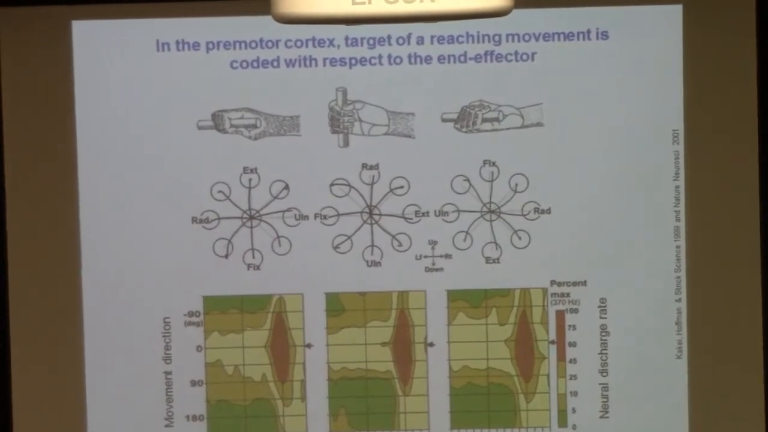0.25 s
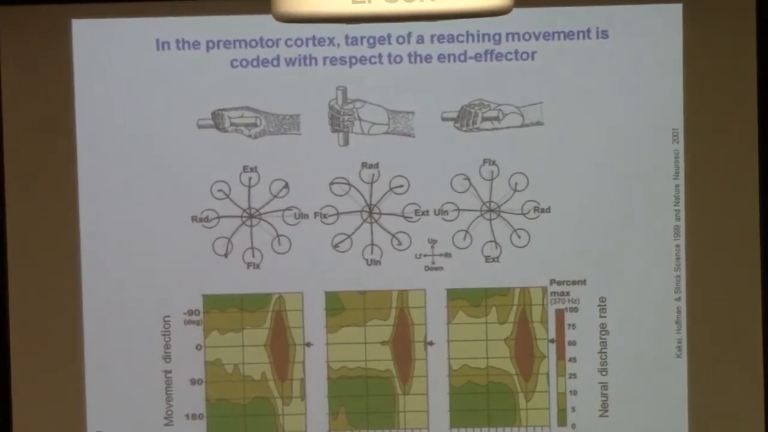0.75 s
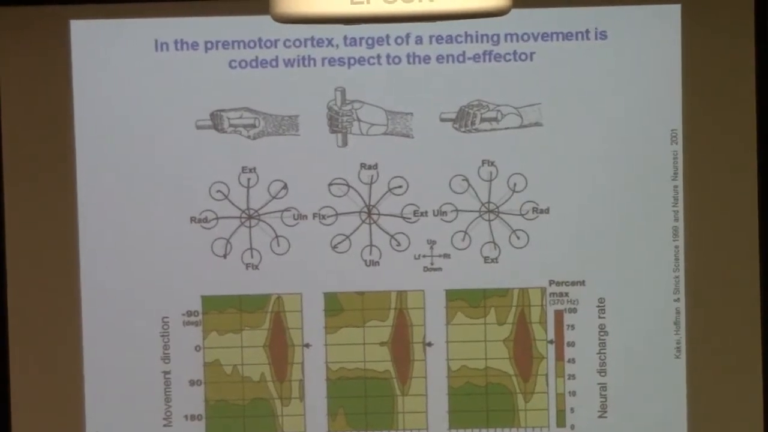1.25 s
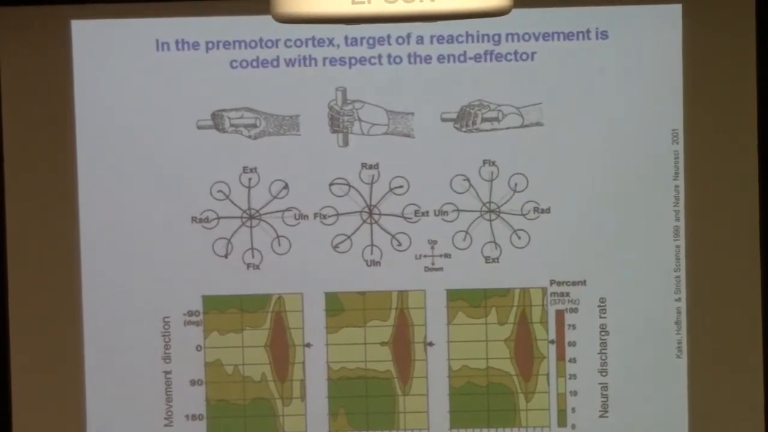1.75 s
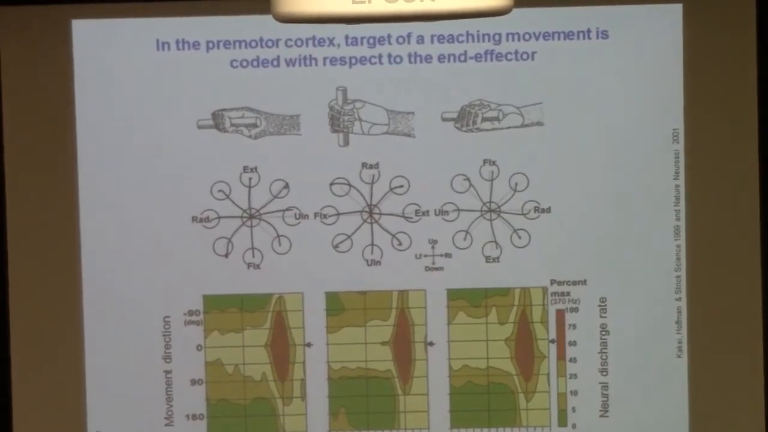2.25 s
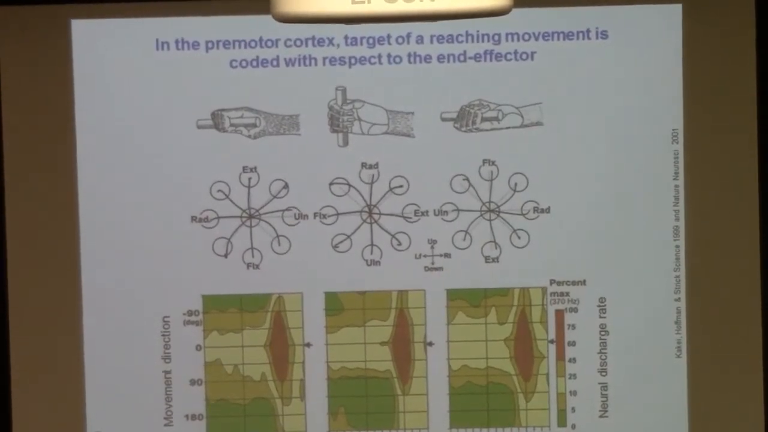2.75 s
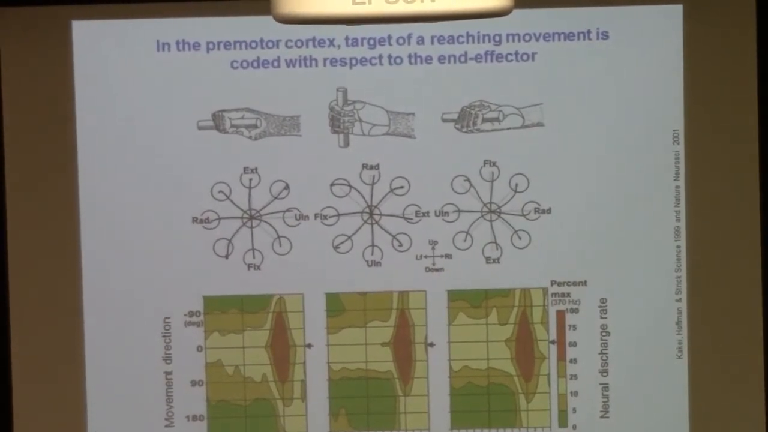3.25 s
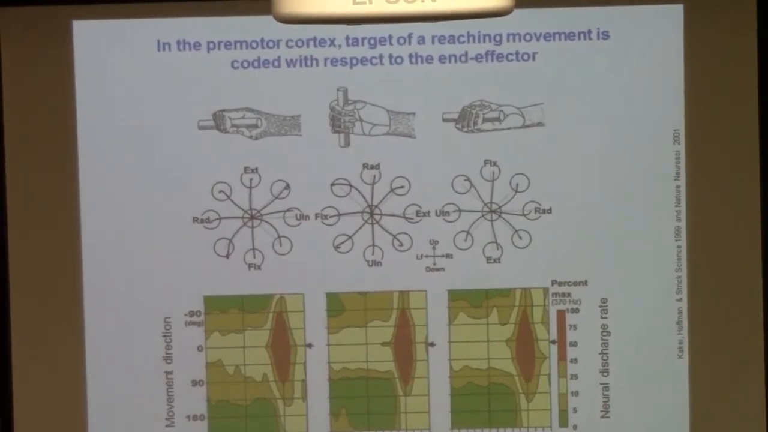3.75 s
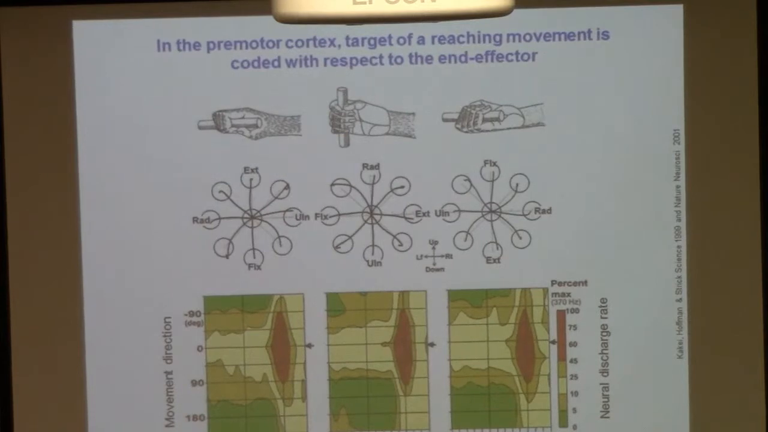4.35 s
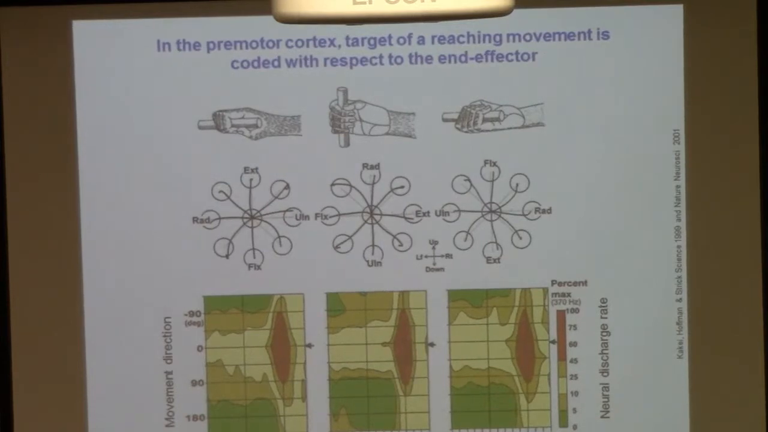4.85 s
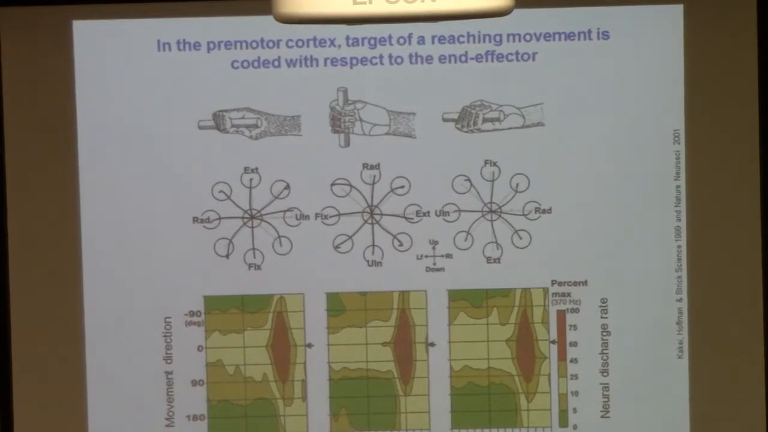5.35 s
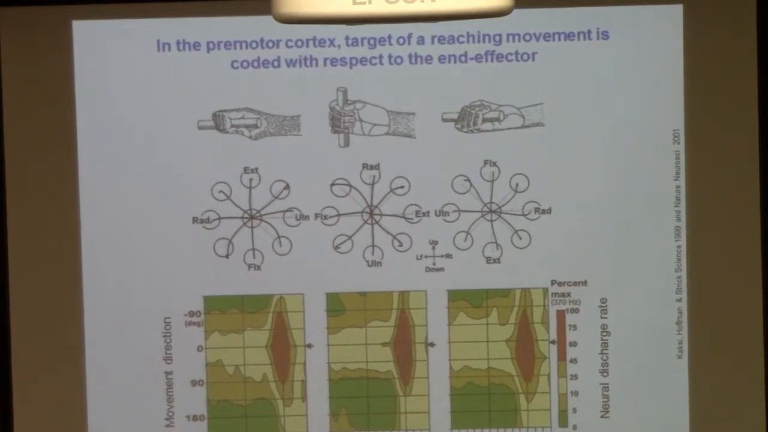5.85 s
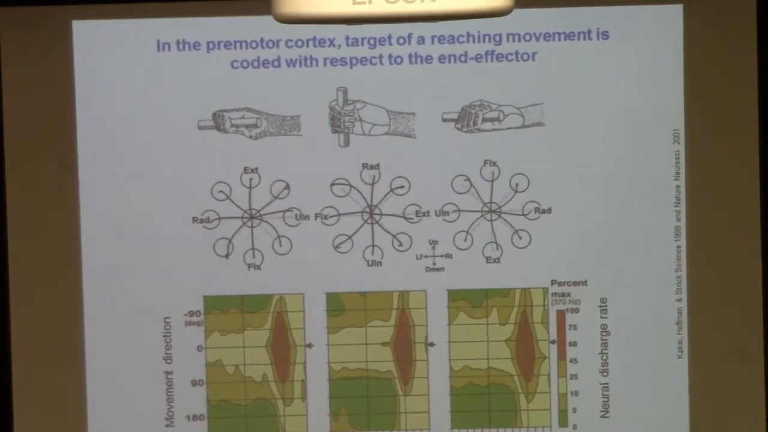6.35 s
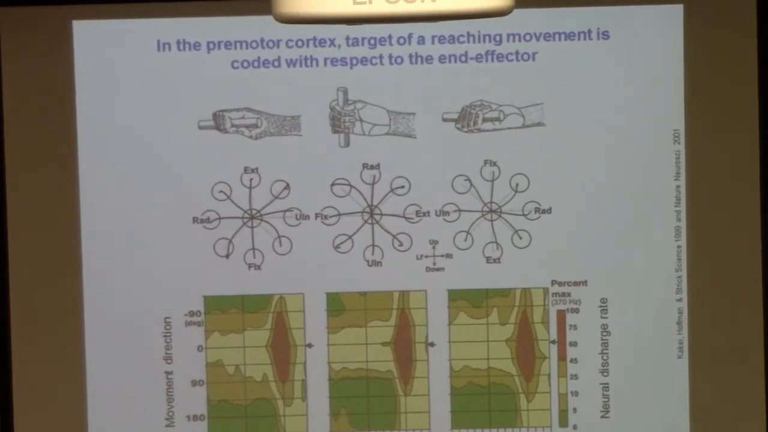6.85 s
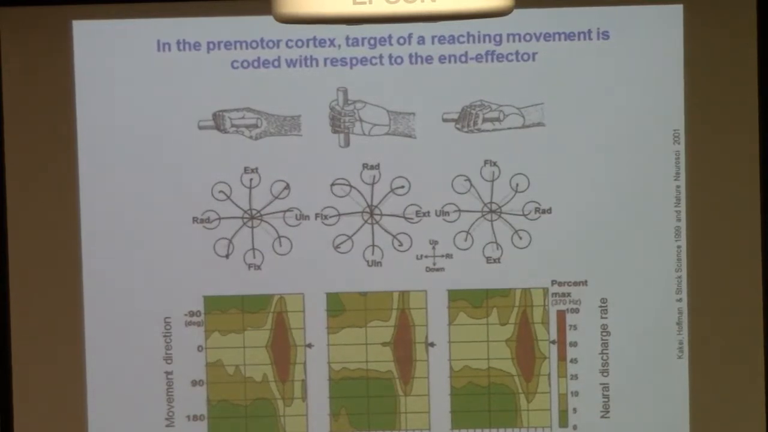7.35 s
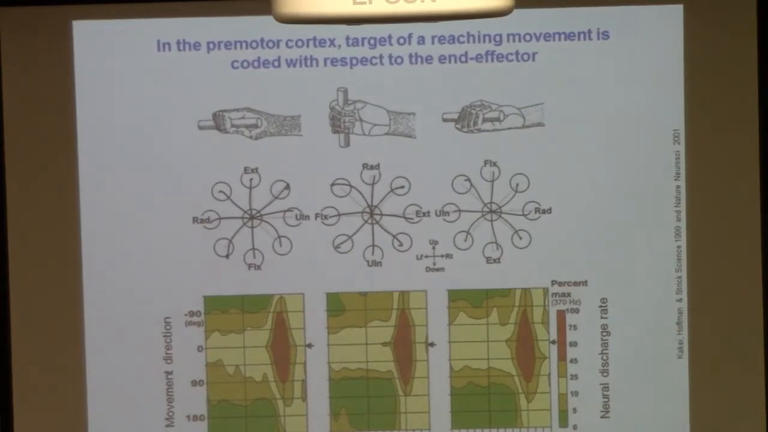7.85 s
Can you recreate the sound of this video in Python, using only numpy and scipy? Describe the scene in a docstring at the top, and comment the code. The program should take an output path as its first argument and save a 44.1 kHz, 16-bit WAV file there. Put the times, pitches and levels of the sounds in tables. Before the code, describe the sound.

Low electrical buzz over soft amplifier hiss, scratched by two brief contact crackles in the first second, then slowly rising and falling in strength.

```python
"""Buzzing mains hum, scratched early on by a loose contact, over amplifier hiss at a stereo input in a quiet room.
Hum: a rectifier switches on and off every half cycle and its edges ring; harmonics are summed into one cycle.
The pickup swells and sinks as a hand or cable moves; a steady ground-loop sine adds to it.
Scratches: grainy noise bursts that also lower the hum. Hiss: filtered noise with a partly shared rumble."""
import sys
import numpy as np
from scipy import signal
from scipy.fft import rfft, irfft
from scipy.io import wavfile
from scipy.ndimage import uniform_filter1d

SR = 44100
rng = np.random.default_rng(int(sys.argv[2]) if len(sys.argv) > 2 else 0)


def field_ratio(decibels):
    """Amplitude ratio for a level in dB (20 dB per decade); scalars and array-likes work."""
    return 10 ** (np.asarray(decibels, dtype=float) / 20)


def generate_wav(signal):
    """Clip the signal to [-1, 1] and save it as 16-bit WAV at the path in sys.argv[1]."""
    frames = np.transpose(np.atleast_2d(signal))
    scaled = np.clip(frames, -1, 1) * 32767
    pcm = np.round(scaled).astype(np.int16)
    wavfile.write(sys.argv[1], SR, pcm)


N = 357210

NOMINAL_HZ = 60
FIRST_TURN_ON_S = 0.00595
WIRING_KHZ, RING_DECAY_MS = 1.834, 0.23  # coupling path: corner of two low-passes, ring time constant
SINE_CREST = 0.24  # mains voltage picked up, in the units of the switching steps
LOOP_CREST_MS = 1.2  # after turn-on
HISS_DB = -61.5

# Mains frequency: time_s, mains_hz
MAINS_TRACK = [(0, 59.9984), (4, 59.9963), (8.1, 59.9953)]
# Rectifier switchings in a half cycle: after_turn_on_ms, step (relative), sag_ms, kick (relative), ring_khz
RECTIFIER_EDGES = [(0, -0.71, 6.9, -3.5, 2.416), (1.32, -0.18, 0.35, 0.5, 2.93),
                   (2.55, 0.35, 29, 1.5, 3.13), (5.45, 0.15, 0.12, 0.21, 2.06)]
# Turn-on spike, unequal as the diodes differ: width_ms, first_half_area, second_half_area (relative)
DIODE_SPIKE = (0.012, -0.0048, -.016)
# Pickup as hand or cable moves: time_s, level_db
PICKUP_TRACK = [(0.0, -49.7), (0.34, -50.5), (0.45, -52), (0.65, -50), (3.25, -50.5), (3.52, -48.5),
                (3.7, -51.5), (3.9, -55), (5.28, -54.5), (5.5, -50), (5.89, -45.5), (6.72, -44.5),
                (6.84, -47), (6.95, -53), (7.11, -54.5), (7.9, -55), (8.1, -49.5)]
# Stereo lean of the pickup: pickup_db, left_minus_right_db
PICKUP_LEAN = [(-53.5, 1.1), (-50, 2.5), (-49, 1.5), (-45.5, -1), (-44.5, -1)]
# Ground-loop sine rms: left_db, right_db
LOOP_LEVELS_DB = [-67.5, -68]
# Cracks of the slipping contact: time_s, level_db, tilt_db_per_octave
CONTACT_CRACKS = [(.077, -48, 0.2), (.881, -48, -1.36)]
# Sizzle, snap and settling of each slip:
# from_crack_ms, length_ms, beside_crack_db, added_tilt_db_per_octave, hum_lost (share)
SLIP_STAGES = [(-25, 29.7, -1, -.5, 0.31), (-6, 13.3, -1, 1.54, 0), (1, 17, 1, -3.5, 0.28)]
# Soft rustles of the contact: start_s, length_s, level_db, tilt_db_per_octave
CONTACT_RUSTLES = [(.654, .042, -59, -1.5), (.698, 0.047, -55, -2), (.75, 0.089, -57.5, -4.5),
                   (.80, .05, -59, -3), (.835, 0.038, -55.5, -2)]
RUSTLE_HUM_LOST = 0.039  # share
# Scratch spectrum before tilt: frequency_hz, density_db (per Hz, relative)
SCRATCH_SPECTRUM = [(60, -7), (120, -1), (300, -5.5), (700, -8), (1300, -11), (1800, -14), (2800, -15.5),
                    (4500, -22), (15000, -37)]
# Hiss spectrum: frequency_hz, density_db (per Hz, relative)
HISS_SPECTRUM = [(8, -4.5), (25, 0), (100, -9), (330, -11.5), (750, -15), (1700, -16), (3800, -17.5),
                 (7000, -19.5), (11000, -21), (16000, -23)]
# Hiss common to left and right: frequency_hz, shared_power (share)
HISS_SHARED = [(20, 0.9), (100, 0.22), (330, 0.23), (1000, .0), (2000, 0.031), (5000, 0)]


def unit_rms(x):
    """Scales to rms 1."""
    return x / np.sqrt(np.mean(x ** 2) + 1e-20)


def read_spectrum(points, hz):
    """Interpolates a spectrum on a log-frequency axis."""
    point_hz, value = np.transpose(points)
    return np.interp(np.log(hz + 1), np.log(point_hz + 1), value)


def coloured(x, db_of_hz):
    """Filters along time by a gain in dB given as a function of frequency."""
    size = x.shape[-1]
    gain = field_ratio(db_of_hz(np.fft.rfftfreq(size, 1 / SR)))
    return irfft(rfft(x) * gain, size)


def drift(top_hz):
    """Slow random motion of rms 1: noise low-passed at top_hz."""
    return unit_rms(coloured(rng.standard_normal(N), lambda hz: -20 * np.log10(1 + (hz / top_hz) ** 2)))


def rectifier_cycle(size=8192):
    """One cycle from turn-on as (steps, rings): odd harmonics of sagging steps and damped rings, plus spikes."""
    k = np.arange(1, 270)  # harmonic
    s = 2j * np.pi * k * NOMINAL_HZ / 1000  # per ms
    damped = s + 1 / RING_DECAY_MS
    wiring = 1 / (1 + s / (2 * np.pi * WIRING_KHZ)) ** 2
    steps, rings = np.zeros((2, size // 2 + 1), complex)
    for after_ms, step, sag_ms, kick, ring_khz in RECTIFIER_EDGES:
        # odd harmonics only: the second half cycle is the first one inverted
        edge = k % 2 * np.exp(-s * after_ms) * 2 * NOMINAL_HZ / 1000 * wiring
        steps[k] += edge * step / (s + 1 / sag_ms)
        rings[k] += edge * kick * damped / (damped ** 2 + (2 * np.pi * ring_khz) ** 2)
    steps[1] -= SINE_CREST / 2

    width_ms, first_area, second_area = DIODE_SPIKE
    areas = first_area + second_area * (-1) ** k
    gaussian = np.exp(-4 * s * width_ms + (s * width_ms) ** 2 / 2)
    rings[k] += areas * gaussian * NOMINAL_HZ / 1000
    fundamental = abs(steps[1] + rings[1])
    return irfft([steps, rings]) / fundamental * size / np.sqrt(2)  # fundamental at rms 1


def turn_on_fizz(turns, fizz_db=-28, decay_ms=0.37, steady=0.14):
    """High-passed noise jumps at each turn-on and decays to a little steady interference."""
    since_ms = turns * 1000 / NOMINAL_HZ % (1000 / (2 * NOMINAL_HZ))
    noise = coloured(rng.standard_normal(N), lambda hz: -10 * np.log10(1 + (1500 / (hz + 1)) ** 2))
    return field_ratio(fizz_db) * noise * (steady + np.exp(-since_ms / decay_ms))


def hum(contact, jitter_us=6.7, waver_db=0.37, flutter_db=0.64, ring_pan=0.91):
    """Plays the cycle at mains speed through a moving coupling; a steady ground-loop sine at mains speed adds."""
    t = np.arange(N) / SR
    mains_hz = np.interp(t, *np.transpose(MAINS_TRACK))
    turns = np.cumsum(mains_hz) / SR - MAINS_TRACK[0][1] * FIRST_TURN_ON_S
    jitter_turns = jitter_us * 1e-6 * NOMINAL_HZ * drift(top_hz=40)  # switching instants tremble
    phase = (turns + jitter_turns) % 1
    steps, rings = (np.interp(phase, np.arange(len(c)) / len(c), c, period=1) for c in rectifier_cycle())

    pickup_db = np.interp(t, *np.transpose(PICKUP_TRACK))
    side_db = np.interp(pickup_db, *np.transpose(PICKUP_LEAN)) * np.array([[0.5], [-0.5]])
    moving_db = pickup_db + waver_db * drift(top_hz=4.4) + flutter_db * drift(top_hz=60)
    sharp = rings + turn_on_fizz(turns)
    picked = field_ratio(moving_db) * contact * (field_ratio(side_db) * steps + field_ratio(ring_pan * side_db) * sharp)

    loop = np.cos(2 * np.pi * (turns - LOOP_CREST_MS * NOMINAL_HZ / 1000))
    return picked + np.sqrt(2) * field_ratio(LOOP_LEVELS_DB)[:, None] * loop


def contact_scratches(grain_db=4.0):
    """Grainy noise bursts, same in both channels, and the hum gain, which drops while the contact chatters."""
    out, contact = np.zeros(N), np.ones(N)
    bursts = []
    for crack_s, crack_db, crack_tilt in CONTACT_CRACKS:
        for from_ms, length_ms, beside_db, added_tilt, lost in SLIP_STAGES:
            bursts.append((crack_s + from_ms / 1000, length_ms / 1000,
                           crack_db + beside_db, crack_tilt + added_tilt, lost))
    bursts += [(*row, RUSTLE_HUM_LOST) for row in CONTACT_RUSTLES]

    for start_s, length_s, level_db, tilt_db, lost in bursts:
        at, size = round(start_s * SR), round(length_s * SR)
        noise, grain = rng.standard_normal((2, 4096))
        grainy = noise * field_ratio(grain_db * unit_rms(uniform_filter1d(grain, size=12)))
        burst = coloured(grainy, lambda hz: read_spectrum(SCRATCH_SPECTRUM, hz)
                         + tilt_db * np.log2(hz / 500 + 0.1))[:size]  # tilt flattens in the bass
        taper = signal.windows.tukey(size, 0.7)
        out[at:at + size] += field_ratio(level_db) * unit_rms(burst) * taper
        contact[at:at + size] *= 1 - lost * taper
    return out, contact


def amplifier_hiss(swell_db=0.8):
    """Filtered noise, mostly separate per channel, with a shared low rumble; its level drifts a little."""
    hz = np.fft.rfftfreq(N, 1 / SR)
    both, left, right = rfft(rng.standard_normal((3, N)))
    shared = read_spectrum(HISS_SHARED, hz)
    spectrum = np.sqrt(shared) * both + np.sqrt(1 - shared) * np.array([left, right])
    noise = unit_rms(irfft(spectrum * field_ratio(read_spectrum(HISS_SPECTRUM, hz)), N))
    return field_ratio(HISS_DB + swell_db * drift(top_hz=1.6)) * noise


def scene():
    """Hum, scratches and hiss add at the input."""
    scratch, contact = contact_scratches()
    return hum(contact) + scratch + amplifier_hiss()


def top_cut(x):
    """Nothing passes above the cut-off."""
    return signal.sosfilt(signal.butter(12, 15650, fs=SR, output="sos"), x)


def record(dry):
    """Adds a small constant offset to the input."""
    mix = dry - 0.0003
    return top_cut(mix)


dry = scene()
out = record(dry)
generate_wav(out)
```